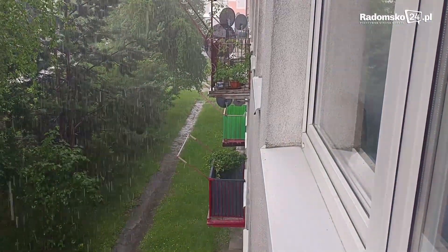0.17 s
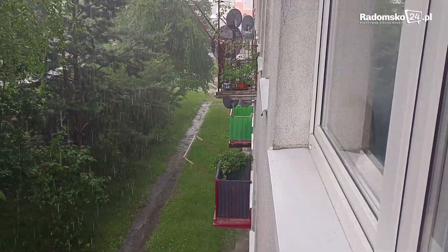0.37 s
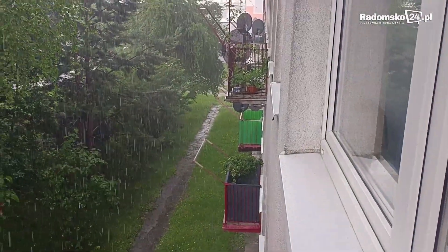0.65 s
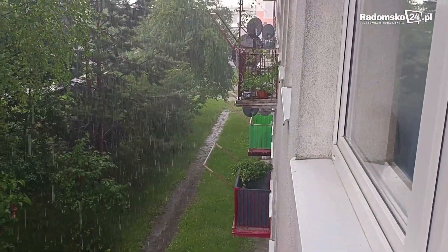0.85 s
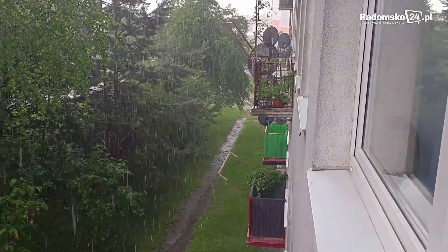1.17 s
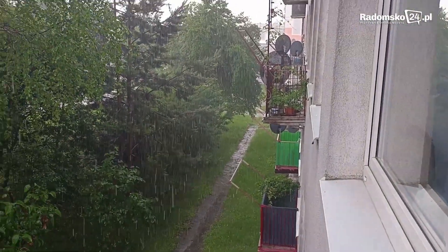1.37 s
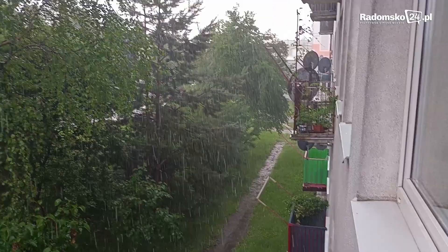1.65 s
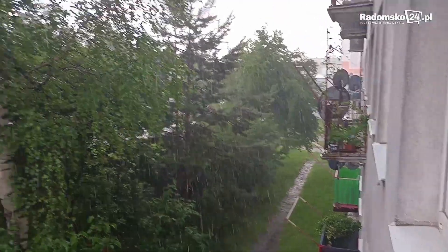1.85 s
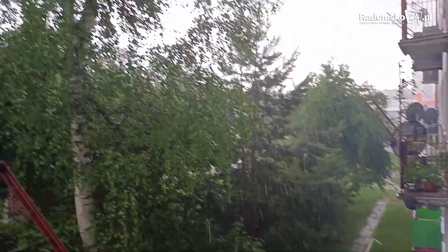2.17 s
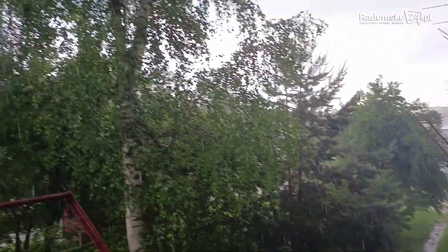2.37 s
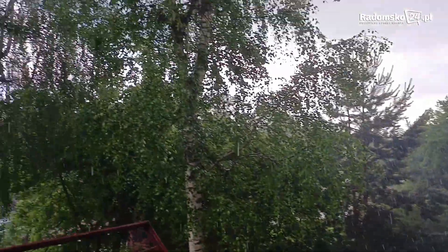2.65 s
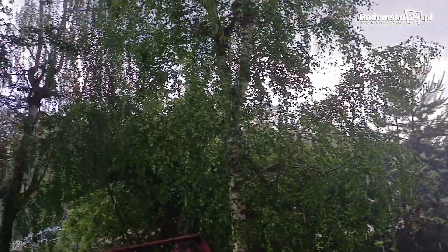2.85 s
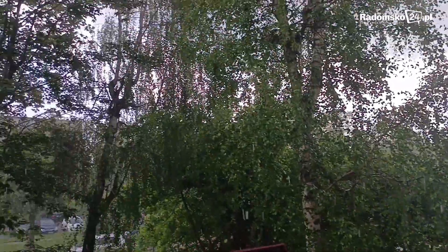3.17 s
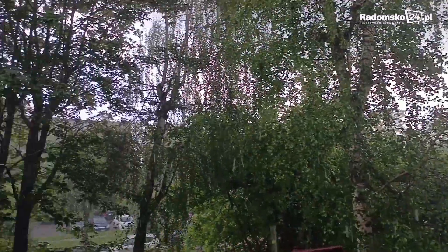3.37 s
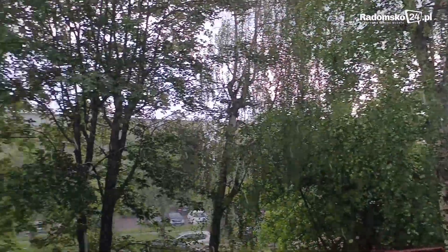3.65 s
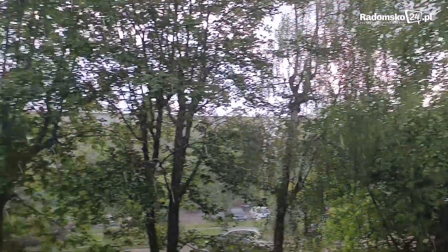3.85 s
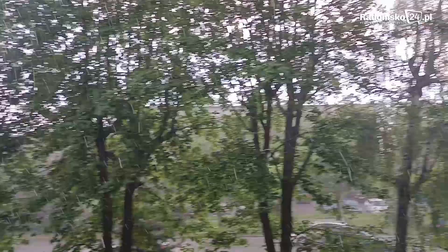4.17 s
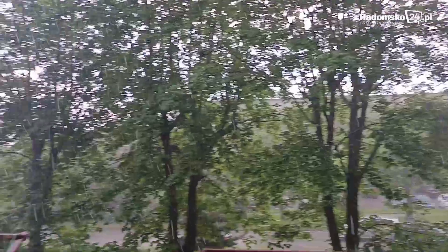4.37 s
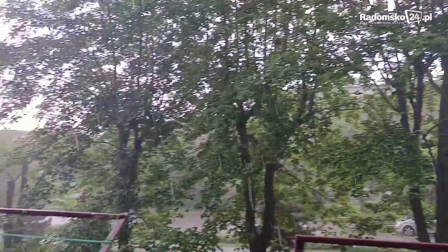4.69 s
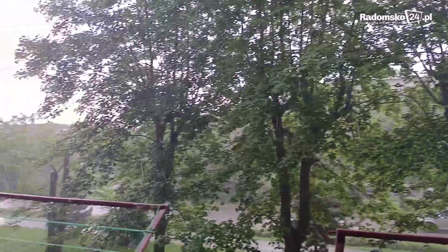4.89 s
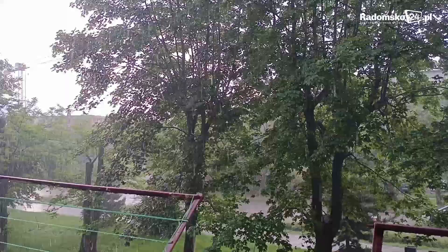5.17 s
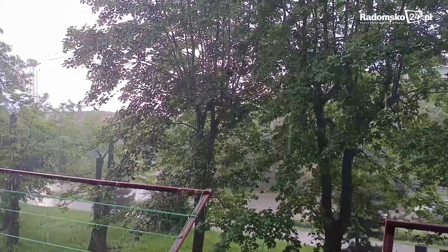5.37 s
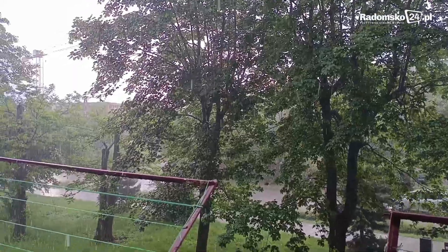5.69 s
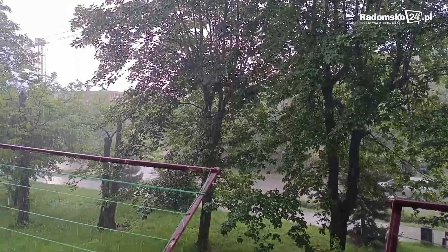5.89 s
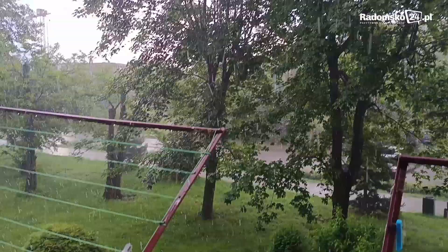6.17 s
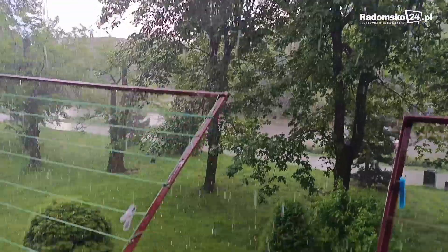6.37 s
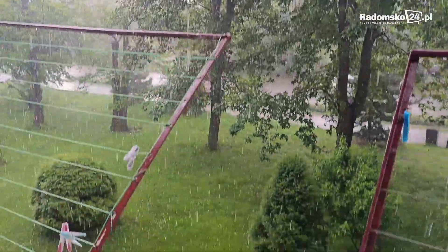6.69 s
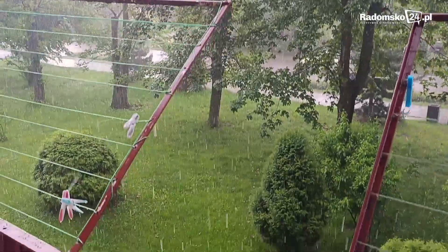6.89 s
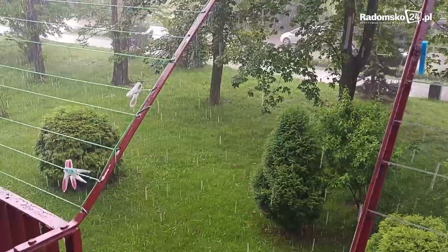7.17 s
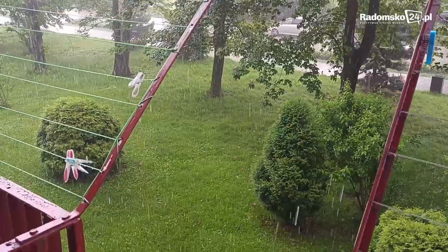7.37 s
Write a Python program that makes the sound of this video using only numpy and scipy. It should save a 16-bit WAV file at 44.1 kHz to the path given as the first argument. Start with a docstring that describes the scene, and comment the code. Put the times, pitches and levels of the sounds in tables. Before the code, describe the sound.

Steady heavy rain outdoors, broad midrange hiss with a softer airy top and almost no bass. Close drops tap metal early, in a quick run halfway through, then sharply near the end, amid tiny bright spray ticks. Muffled drops thud on soil and broad leaves. The rain dips very briefly now and then; a distant vehicle wavers faintly behind it. Single microphone at a window, no echo.

```python
"""A steady downpour on trees and grass, heard in mono from an open window.
Far drops merge into a wash of fluttering noise bands; nearer ones are impacts that ring leaves or small bubbles.
A few fat drops smack on the sill and railing, ringing metal modes under a noise splash, or flick fine spray.
Heavy drops drum dully on soil and broad leaves, and the level dips briefly now and then.
Behind the trees a faint engine hums on the road, a wavering sine and rumble over a low street murmur."""
import sys
import numpy as np
from scipy import signal
from scipy.fft import rfft, irfft, next_fast_len
from scipy.io import wavfile
from scipy.ndimage import uniform_filter1d, minimum_filter1d

SR = 44100
rng = np.random.default_rng(int(sys.argv[2]) if len(sys.argv) > 2 else 0)


def pcm_store(signal):
    """Save signal as 16-bit PCM."""
    levels = np.round(np.clip(np.atleast_2d(signal), -1, 1) * 32767)
    wavfile.write(sys.argv[1], SR, levels.astype(np.int16).T)


N = 332072
T = np.arange(N) / SR


def rain():
    """Wash, leaf patter, bubbles and sharp splats swell together; the finest spray has its own level."""
    # the shower before the dips: t/s, level of the rain body/dB, level of the fine spray/dB
    shower_levels = [(0, -22, -39.5), (1.3, -22, -38.5), (2.3, -21.5, -38.5), (3.6, -21.5, -38.5),
                     (4.6, -22, -37), (6.2, -22, -38.5), (7.53, -22, -36.5)]
    # relative spectrum of rain on foliage: f/Hz, level/dB (per Hz)
    rain_colour = [(420, -38.5), (480, -26), (520, -8.5), (760, -4), (955, -7), (1450, -2), (2370, 0.63),
                   (3500, -2.5), (4520, -5), (5570, -9.5), (6600, -16), (8450, -12.5), (10400, -26),
                   (15800, -22.5)]
    # colour of the microphone port: f/Hz, width/Hz, level/dB
    port_colour = [(2150, 690, -1), (4520, 600, -3.5), (6500, 230, -5), (8550, 310, 2), (10180, 710, -3)]
    body_db, spray_db = in_time(shower_levels)

    far = wash(flutter_db=1.56)
    leaves = from_db(-3.0) * patter(per_s=6000, spread_db=3.0, largest=4.5, damping=0.6)
    bubbles = from_db(-13.5) * plinks(per_s=120, cycles=180, spread_db=3.0)
    splats = from_db(-9.5) * rms_one(impacts(per_s=1100, spread_db=1.5, largest=3.6))

    swell = from_db(0.47 * drift(18))
    shower = coloured(far + leaves + bubbles + splats, rain_colour, port_colour) * swell
    treble = signal.butter(4, 9500, "high", fs=SR, output="sos")
    spray = signal.sosfiltfilt(treble, shower)  # zero phase, so it subtracts cleanly
    body = rms_one(shower - spray)
    flicker = from_db(1.06 * drift(13))
    return from_db(body_db) * body + from_db(spray_db) * flicker * rms_one(spray)


def wash(flutter_db):
    """Far drops merge into a hiss whose bands flutter as the leaves shed water."""
    out, edges = 0, np.geomspace(300, 20000, 15)
    for low, high in zip(edges, edges[1:]):
        hiss = band(rng.standard_normal(N), low, high)
        out = out + hiss * from_db(flutter_db * drift(17.7))
    return rms_one(out)


def patter(per_s, spread_db, largest, damping):
    """Each near drop sets one leaf ringing for a cycle or two; small, high leaves are hit most often."""
    out, pitches = 0, np.geomspace(450, 15000, 14)
    total = np.sqrt(pitches).sum()
    for hz in pitches:
        hits = impacts(per_s * np.sqrt(hz) / total, spread_db, largest)
        ringing = rms_one(resonance(hits, hz, damping * hz))
        out = out + np.sqrt(hz) * ringing
    return rms_one(out)


def plinks(per_s, cycles, spread_db):
    """Drops falling into water ring a small bubble, each at its own, slightly rising pitch."""
    out, t = np.zeros(N), T[:SR // 12]
    for when, size, pitch in rng.random((int(per_s * N / SR), 3)):
        hz, at = 900 * 12 ** pitch, int(when * N)
        age = hz * t / cycles  # 1 where the ring has lost 60 dB
        rise = 1 + 0.022 * np.minimum(age, 1)
        tone = np.sin(2 * np.pi * hz * t * rise) * from_db(-60 * age)
        strength = hz * from_db(spread_db * min(-np.log(1 - size), 3))
        out[at:at + len(t)] += (strength * tone)[:N - at]
    return rms_one(out)


def fat_drops(overtone=1.92, overtone_db=-7, water_db=-3, water_s=0.012, splash_s=0.002, spatter_share=0.07):
    """A smack bursts in a short splash and rings two modes of the metal, cleaner once the water has spread."""
    # drops on sill and railing: t/s, peak level of the ring before the bass cut and dips/dB,
    # ring f/Hz, time of the ring to fall 60 dB/s, splash level re the ring/dB
    drops = [(.202, -16.5, 4700, 0.26, -15), (0.263, -13, 2420, 0.18, -16), (.433, -19, 5730, .05, -11),
             (.473, -3.5, 1535, 0.036, 0), (1.502, -11, 2360, 0.049, -21), (1.513, -8, 2640, .015, -14),
             (3.25, -13.5, 2390, 0.055, 0), (3.257, -12.5, 2500, 0.044, 3), (3.29, -12, 2400, .07, -6),
             (3.345, -14, 2280, .04, -1), (3.4, -14, 2450, 0.11, -12), (3.525, -13, 2370, 0.077, -6),
             (3.5592, -6, 2420, 0.13, -2.5), (3.566, -6.5, 2310, .06, -4), (3.574, -12, 2530, 0.086, -11),
             (3.701, -9.5, 2360, .03, -10), (3.756, -14.5, 2310, .07, 1.5), (3.8, -12.5, 2900, .04, 1),
             (3.933, -13, 2950, 0.044, -13), (4.883, -12, 2750, 0.2, -1), (5.157, -12, 1995, .06, -1),
             (5.205, -10, 2400, .06, -13), (5.547, -10, 2120, .025, -6), (5.978, -8.5, 2430, .03, -15),
             (6.2917, -1.5, 2770, 0.015, -5), (6.436, -2.5, 1760, 0.031, -17), (6.647, -6, 2495, 0.13, -2),
             (6.762, -12, 2650, .03, -5), (7.441, -21, 7700, .12, -12)]
    out, t = np.zeros(N), T[:SR // 5]
    for s, peak_db, hz, t60, splash_db in drops:
        water_noise, splash_noise = rng.standard_normal((2, len(t)))
        decay = from_db(-60 * t / t60)

        # the overtone decays twice as fast: by itself here and again with the whole ring
        upper = from_db(overtone_db) * decay * np.sin(2 * np.pi * hz * overtone * t)
        modes = np.sin(2 * np.pi * hz * t) + upper
        water = from_db(water_db) * rms_one(resonance(water_noise, hz, 0.22 * hz)) * np.exp(-t / water_s)
        ring = (modes + water) * decay

        # metal that rings longer shakes its water off for longer
        spatter = np.exp(-t / (splash_s + spatter_share * t60))
        splash = band(band(splash_noise, 730, 4800), 730, 4800) * spatter
        smack = ring / np.abs(ring).max() + from_db(splash_db) * splash / np.abs(splash).max()
        at = round(s * SR)
        out[at:at + len(t)] += from_db(peak_db) * smack[:N - at]
    return high_pass(out, 480)


def spray_ticks(level_db=-4, decay_s=0.00033, mist_db=-15, mist_s=.008):
    """Tiny droplets burst in a millisecond of bright hiss, and a finer mist settles after them."""
    # spray landing close by: t/s, level of one tick against the others/dB
    ticks = [(0.1989, -19), (0.661, -11), (0.9004, -8), (1.0524, -14), (1.2526, -15), (2.368, -11),
             (2.8794, -19), (4.0127, -13), (4.3231, -19), (5.0754, -18), (5.225, -18), (5.91, -15),
             (6.4193, -19), (6.5146, -17), (7.0394, -17), (7.4365, -17)]
    onsets, t = np.zeros(N), T[:SR // 16]
    for s, tick_db in ticks:
        onsets[round(s * SR)] = from_db(tick_db + level_db)
    shape = np.exp(-t / decay_s) + from_db(mist_db) * np.exp(-t / mist_s)
    envelope = signal.oaconvolve(onsets, shape)[:N]
    return band(envelope * rng.standard_normal(N), 10000, 0.48 * SR)


def drumming(per_s=900, spread_db=2.0, uneven_db=4.5, uneven_per_s=9):
    """Heavy drops on soil and on broad leaves blur into two dull, uneven patters that thicken in each flurry."""
    # steady drumming before the dips: t/s, level on soil/dB, level on broad leaves/dB
    steady_levels = [(0, -53.5, -59), (1.4, -57.5, -63.5), (1.9, -51.5, -42.5), (2.5, -55.5, -65),
                     (3.4, -52.5, -44.5), (4.8, -58, -55.5), (5.35, -59, -44.5), (5.8, -57, -55.5),
                     (6.3, -56.5, -49), (7.53, -62.5, -55)]
    # flurries shed by the trees: t/s, peak level on soil/dB, peak level on broad leaves/dB
    flurry_levels = [(1.05, -45, -56), (2.93, -49, -44), (3.39, -53, -46), (3.78, -45, -40),
                     (4.31, -62, -41), (4.64, -56, -41.5), (5.08, -44.5, -38.5), (6.24, -56, -42),
                     (6.5, -50, -45)]
    flurry_s = 0.037  # from the top of a flurry to 1/e of it
    soil_thud, leaf_thud = (326, 89), (453, 139)  # centre f/Hz, width/Hz

    out = 0
    times, *flurry_dbs = np.transpose(flurry_levels)
    surfaces = zip(in_time(steady_levels), flurry_dbs, (soil_thud, leaf_thud))
    for db, peaks_db, (hz, width_hz) in surfaces:
        uneven = from_db(uneven_db * np.minimum(drift(uneven_per_s), 1))
        steady = from_db(db) * rms_one(uneven)
        flurries = sum(from_db(peak_db) * np.exp(-((T - s) / flurry_s) ** 2)
                       for s, peak_db in zip(times, peaks_db))
        hits = impacts(per_s, spread_db, largest=3.3)
        dull = band(hits, hz - width_hz / 2, hz + width_hz / 2)
        thuds = resonance(dull, hz, 2 * width_hz)
        out = out + np.hypot(steady, flurries) * rms_one(thuds)
    return out


def dips():
    """The level falls quickly, stays low for a moment and comes back."""
    # brief dips: t/s, depth/dB, hold/s
    dip_times = [(0.47, 6, 0.047), (1.168, 5, 0.031), (1.306, 3.5, 0.022), (2.376, 2, .01),
                 (3.087, 4.5, 0.031), (3.551, 5, .001), (3.6, 3, 0.039), (5.468, 5.5, 0.015),
                 (5.924, 3, 0.0066), (5.994, 2.5, .012), (6.305, 4, 0.041), (6.433, 4.5, 0.013),
                 (6.631, 5, 0.029), (6.771, 5, 0.024), (7.352, 6, 0.024)]
    fall_s, recovery_s = 0.0043, 0.025
    db = np.zeros(N)
    for s, depth_db, hold_s in dip_times:
        corners = s + np.cumsum([0, fall_s, hold_s, recovery_s])
        db -= depth_db * np.interp(T, corners, [0, 1, 1, 0])
    return from_db(db)


def street(tone_db=-2, rumble_db=-7, murmur_db=-69, waver_db=2.2, murmur_waver_db=2.5):
    """The firing tone and some rumble of the engine swell and fade over the wavering murmur of the street."""
    # far engine, middle of its wandering firing rate: t/s, f/Hz
    firing_rate = [(0, 58), (1.5, 60), (2.0, 66), (2.4, 71), (3.5, 70), (4.3, 72), (4.9, 74), (5.6, 77),
                   (6.2, 80), (6.8, 70)]
    # spells in which it comes through: start t/s, length/s, level that tone and rumble are set against/dB
    spells = [(.77, .07, -62), (1.53, 0.29, -62), (2.08, .16, -60), (2.39, 1.11, -57.5), (3.8, 0.56, -57),
              (4.52, 1.08, -60.5), (5.66, .61, -59), (6.38, 0.14, -61), (6.73, .06, -63)]
    # relative spectrum of the low murmur: f/Hz, level/dB (per Hz)
    murmur_colour = [(20, -15), (50, -22), (85, -4), (135, 1), (175, -4.5), (240, 3), (400, -34)]
    rise_s, fade_s = .04, .06

    heard = 0
    for s, length, db in spells:
        end = s + length
        rise = np.interp(T, [s - rise_s / 2, s + rise_s / 2], [0, 1])
        fade = np.interp(T, [end - fade_s / 2, end + fade_s / 2], [1, 0])
        heard = heard + from_db(db) * rise * fade

    hz, = in_time(firing_rate)
    wandering_hz = hz * (1 + .012 * drift(6.5))
    tone = rms_one(np.sin(2 * np.pi * np.cumsum(wandering_hz) / SR))
    rumble = rms_one(band(rng.standard_normal(N), 52, 115))
    waver = from_db(waver_db * drift(9.2))
    engine = heard * waver * (from_db(tone_db) * tone + from_db(rumble_db) * rumble)
    murmur_level = from_db(murmur_db + murmur_waver_db * drift(6.8))
    murmur = murmur_level * coloured(rng.standard_normal(N), murmur_colour)
    return engine + murmur


def impacts(per_s, spread_db, largest):
    """Random impacts of either sign: many small, few large, none above spread_db * largest."""
    sizes = from_db(spread_db * np.minimum(rng.exponential(1, N), largest))
    struck = rng.random(N) < per_s / SR
    return sizes * rng.choice([-1, 1], N) * struck


def resonance(x, hz, width_hz):
    """Two-pole resonance with gain 1 on top."""
    r = np.exp(-np.pi * width_hz / SR)
    zeros = np.array([1, 0, -1]) * (1 - r * r) / 2
    poles = [1, -2 * r * np.cos(2 * np.pi * hz / SR), r * r]
    return signal.lfilter(zeros, poles, x + 1e-18)


def band(x, low_hz, high_hz):
    """Butterworth band-pass."""
    sos = signal.butter(2, [low_hz, high_hz], "band", fs=SR, output="sos")
    return signal.sosfilt(sos, x + 1e-18)


def high_pass(x, hz):
    """Steep bass cut."""
    return signal.sosfilt(signal.butter(6, hz, "high", fs=SR, output="sos"), x + 1e-18)


def coloured(x, points, bumps=()):
    """Give a steady sound a spectrum, with bell-shaped bumps on it; rms 1."""
    size = next_fast_len(N, real=True)
    hz = np.arange(size // 2 + 1) * SR / size + 1  # 1 Hz up, to keep the logarithm finite
    at, level_db = np.transpose(points)
    db = np.interp(np.log(hz), np.log(at), level_db)
    for centre, width, bump_db in bumps:
        db = db + bump_db * np.exp(-2 * ((hz - centre) / width) ** 2)
    return rms_one(irfft(rfft(x, size) * from_db(db), size)[:N])


def drift(rate):
    """Slow chance with rms 1: noise through two equal low-pass poles at a rate in Hz."""
    step = 40  # samples between the slow values
    r = np.exp(-2 * np.pi * rate * step / SR)
    noise = rng.standard_normal(N // step + 2002)
    slow = signal.lfilter([1], [1, -2 * r, r * r], noise)[2000:]  # skip the settling of the filter
    return np.interp(np.arange(N) / step, np.arange(len(slow)), rms_one(slow))


def in_time(rows):
    """Each column of a curve at every sample."""
    s, *columns = np.transpose(rows)
    return [np.interp(T, s, c) for c in columns]


def from_db(db):
    """Decibels to gain."""
    return 10 ** (np.asarray(db) / 20)


def rms_one(x):
    """Scale to unit rms."""
    return x / np.sqrt(np.mean(x ** 2) + 1e-20)


def scene():
    """Everything reaches one microphone; the dips touch the rain and drops, not the street."""
    near = rain() + fat_drops() + spray_ticks() + drumming()
    mono = near * dips() + street()
    return np.array([mono, mono])


def record(dry):
    """A fast limiter holds peaks to full scale, then the top is cut steeply."""
    needed = 1 / np.maximum(np.abs(dry), 1)
    gain = uniform_filter1d(minimum_filter1d(needed, size=65), size=65)
    cut = signal.ellip(16, .1, 75, 15850, fs=SR, output="sos")  # ripple dB, stop dB, corner Hz
    return signal.sosfilt(cut, dry * gain)


dry = scene()
out = record(dry)
pcm_store(out)
```